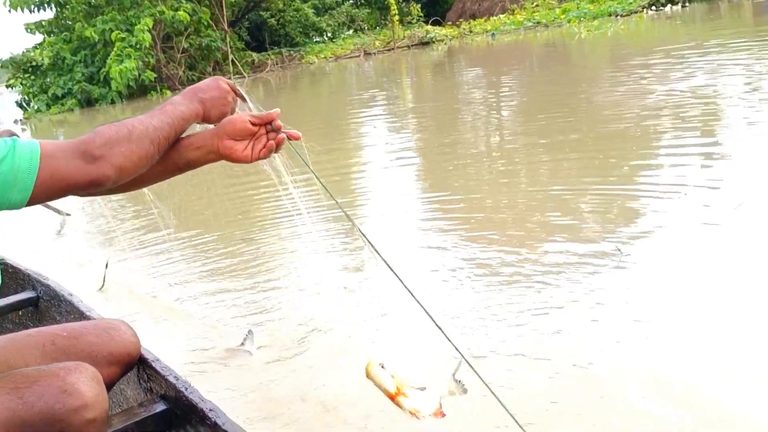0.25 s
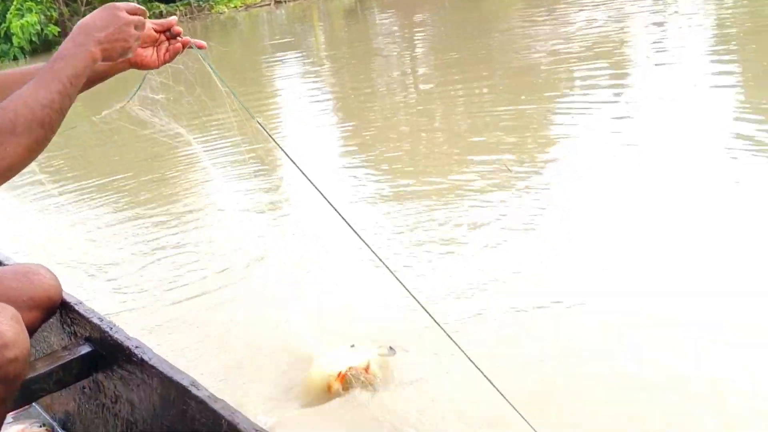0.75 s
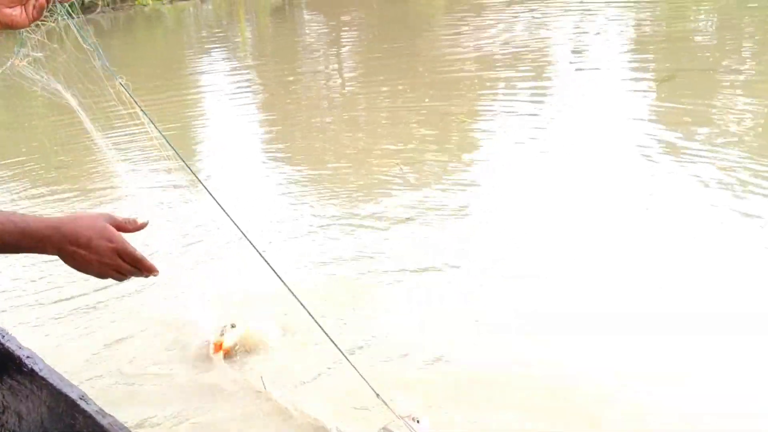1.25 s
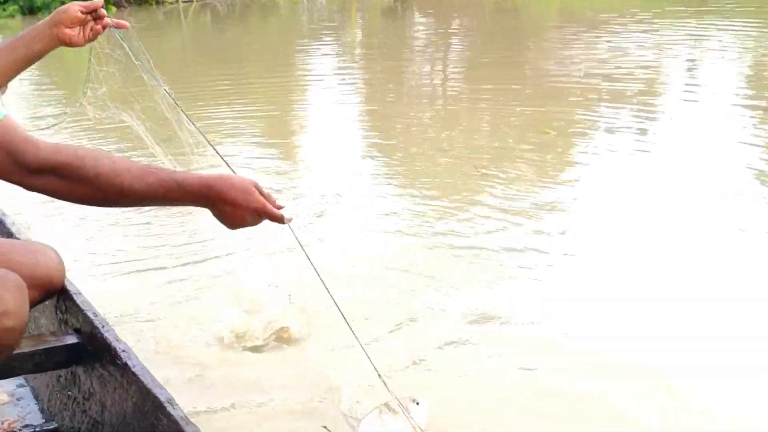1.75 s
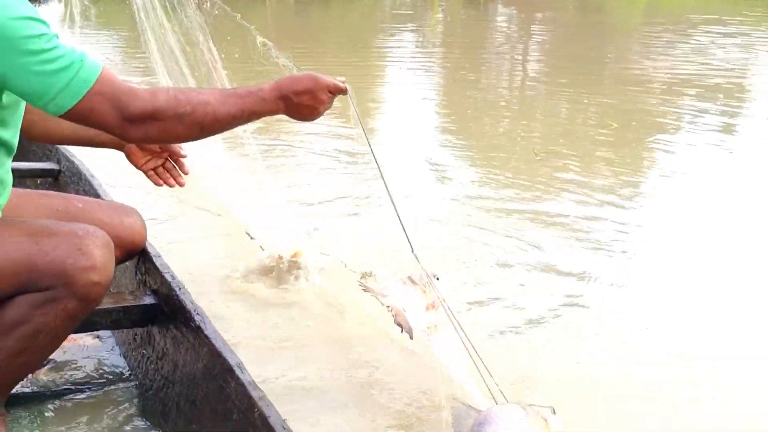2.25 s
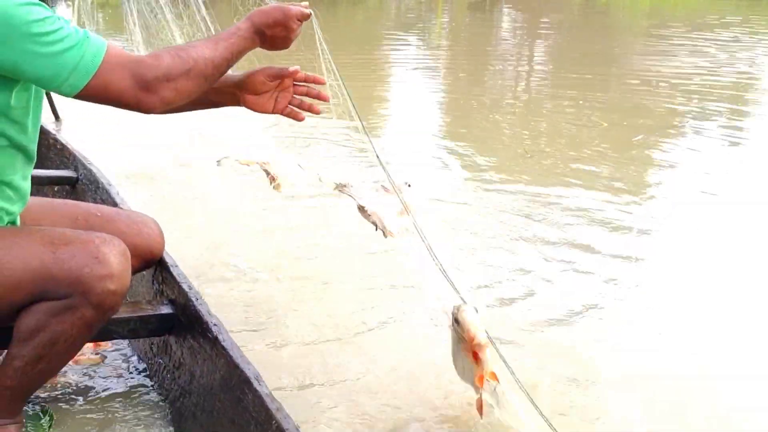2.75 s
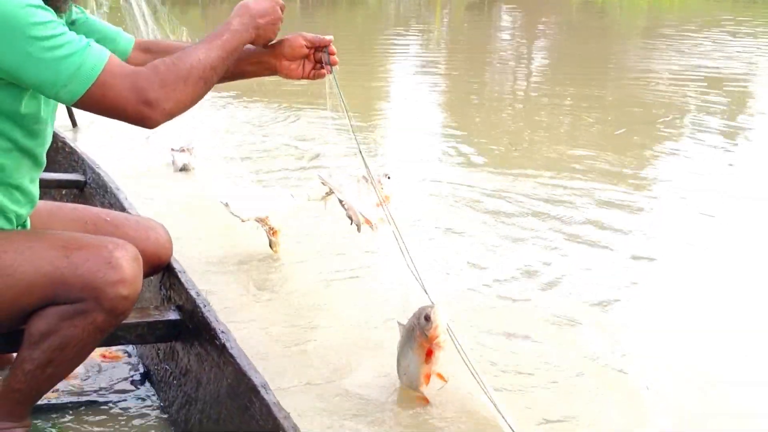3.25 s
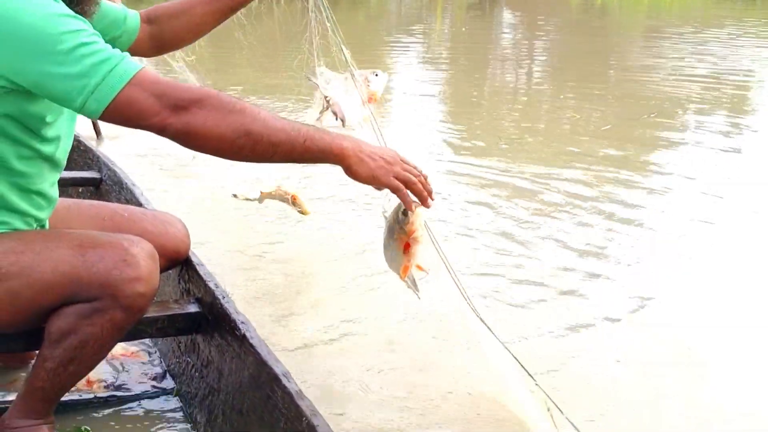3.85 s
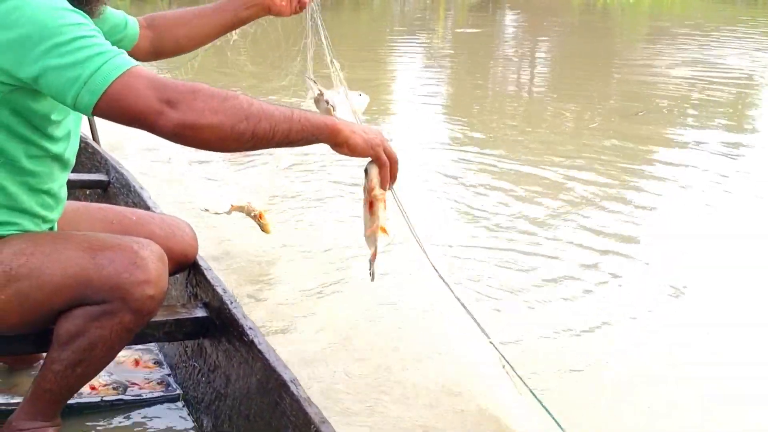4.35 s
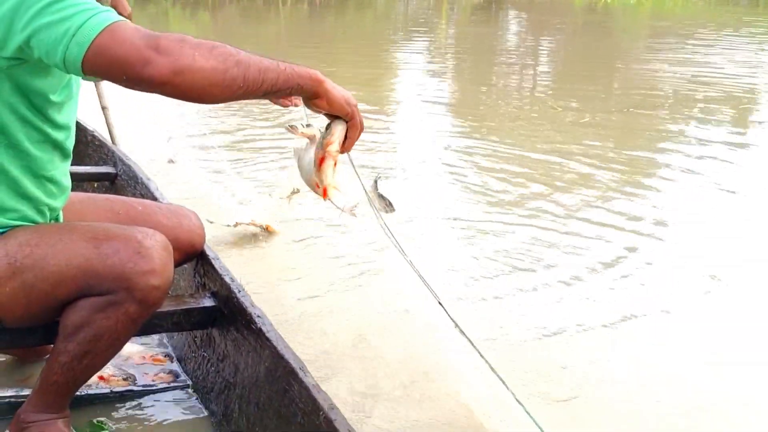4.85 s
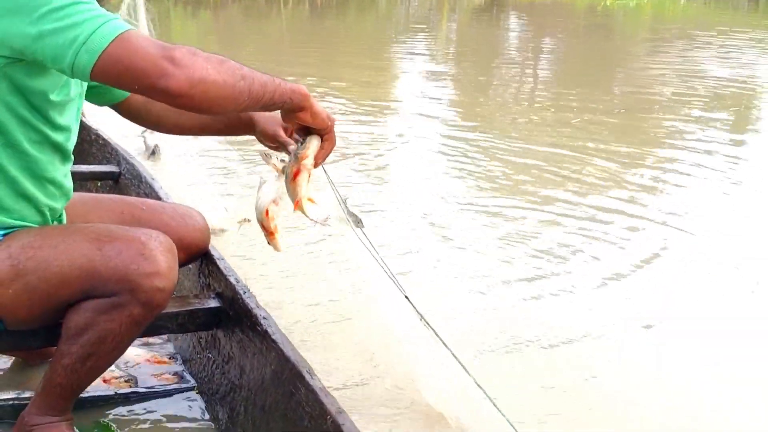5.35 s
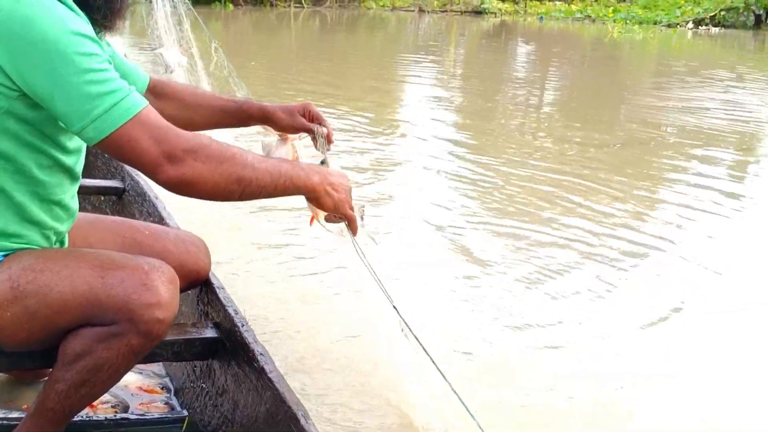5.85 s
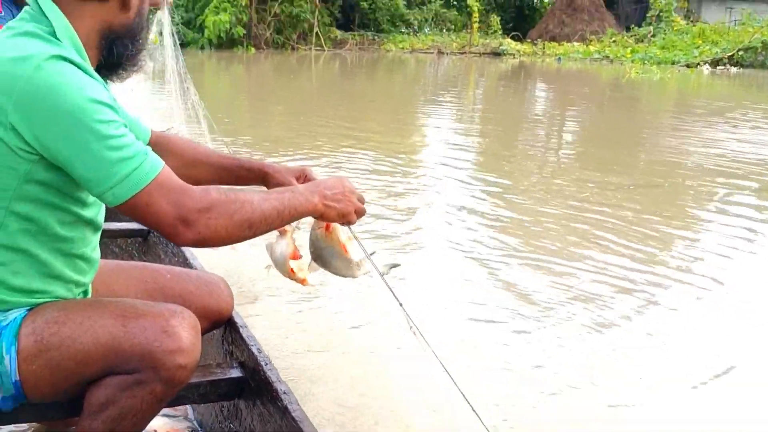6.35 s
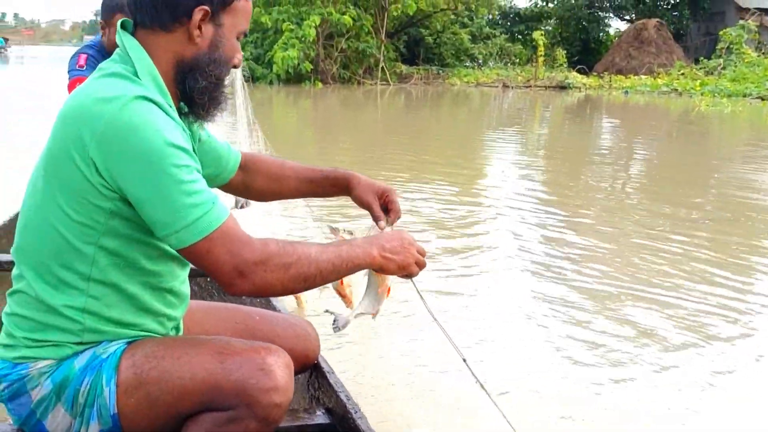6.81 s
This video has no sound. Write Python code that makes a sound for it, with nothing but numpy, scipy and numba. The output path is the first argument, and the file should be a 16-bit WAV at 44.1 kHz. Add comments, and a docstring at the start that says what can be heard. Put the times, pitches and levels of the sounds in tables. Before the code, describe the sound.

Fish thrash and water patters off a net beside a boat, with bubbly plops, tiny bright ticks and hollow low thuds on the planks. The biggest splash comes about a third of the way in, then the handling quietens. Birds to the right take over with short falling chirps, sliding whistles and a buzzy trill, broken by one loud knock and later a light rattle on the wood. Close outdoor stereo pickup, faint air behind.

```python
"""Net hauled over a boat's side

A fisherman hauls a net with small fish in it over the side of a wooden boat on a calm river.
Hull thumps and knocks are damped modes; splashes and drips are gliding bubble rings and puffs of noise.
The mesh ticks softly; birds on the bank to the right are swept tones and rough grains.
Behind it all lies a very quiet background, open air with a haze of distant birds: noise in wavering bands.
"""
import sys
import numpy as np
from scipy import signal
from scipy.io import wavfile
from scipy.ndimage import uniform_filter1d
from numba import njit

SR = 44100
rng = np.random.default_rng(int(sys.argv[2]) if len(sys.argv) > 2 else 0)


def log_audio(samples):
    """Write samples as a 16-bit WAV file to the path given in sys.argv[1]."""
    # one column per channel
    frames = np.atleast_2d(samples).T
    # limit to full scale, then quantise
    limited = np.clip(frames, -1, 1)
    pcm = np.round(limited * 32767).astype(np.int16)
    wavfile.write(sys.argv[1], SR, pcm)


N = 312228
TIME = np.arange(N) / SR


def undb(db):
    """Decibels to gain."""
    return 10 ** (np.asarray(db) / 20)


def unit(x):
    """Scale to rms 1."""
    return x / np.sqrt(np.mean(x ** 2) + 1e-30)


def curves(table):
    """Each column of a table interpolated over time."""
    s, *columns = np.transpose(table)
    return [np.interp(TIME, s, c) for c in columns]


def during(table):
    """Gate: 1 while a table lasts, with 10 ms edges."""
    inside = (TIME >= table[0][0]) & (TIME <= table[-1][0])
    return uniform_filter1d(1. * inside, 441)


def progress(length_s):
    """0 to 1 over a note."""
    return np.linspace(0, 1, max(int(length_s * SR), 99))


def add(out, s, x):
    """Mix a sound in at time s."""
    i = int(np.clip(s * SR, 0, N - 1))
    out[..., i:i + x.shape[-1]] += x[..., :N - i]


def band(x, hz, width_hz):
    """Steep band-pass around hz."""
    low = np.hypot(hz, width_hz / 2) - width_hz / 2
    high = min(low + width_hz, .48 * SR)
    return signal.sosfilt(signal.butter(3, [low, high], "bandpass", fs=SR, output="sos"), x)


def walk(rate_hz):
    """Random levels, held 1 / rate_hz and slewed twice; rms near 1."""
    k = max(int(SR / rate_hz), 2)
    steps = np.repeat(rng.standard_normal(N // k + 1), k)
    return unit(uniform_filter1d(uniform_filter1d(steps, k), k)[:N])


def swells(table, rise_db_per_s):
    """Summed gain of swells that each build up to a height and fade."""
    return sum(undb(db - np.maximum((s - TIME) * rise_db_per_s, (TIME - s) * fade_db_per_s))
               for s, db, fade_db_per_s in table)


def pan(x, pan_db):
    """Level of left over right in dB; the overall level dips somewhat as the pan widens."""
    gains = undb(np.array([[pan_db], [-pan_db]]) / 2)
    return x * gains / np.sqrt(np.cosh(pan_db * np.log(10) / 10))


def scatter(x, t60_s, wet_db):
    """Add a tail of scattered reflections, different at each ear."""
    t = np.arange(int(t60_s * SR)) / SR
    tail = rng.standard_normal((2, len(t))) * 1000 ** (-t / t60_s)
    tail /= np.sqrt(np.sum(tail ** 2, axis=1, keepdims=True))
    wet = signal.fftconvolve(np.broadcast_to(x, (2, N)), tail, axes=1)[:, :N]
    return (x + undb(wet_db) * wet) / np.sqrt(1 + undb(2 * wet_db))


@njit
def ring_grains(start, step, cycles, size, glide, n):
    """Damped sines that glide; cycles = turns at the start pitch until the ring has died."""
    out = np.zeros(n)
    for k in range(len(start)):
        length, phase = int(2 * np.pi * cycles[k] / step[k]) + 2, 0.
        for i in range(min(length, n - start[k])):
            u = i / length
            phase += step[k] * (1 + glide * u)
            out[start[k] + i] += size[k] * (np.exp(-6 * u) - np.exp(-40 * u)) * np.sin(phase)
    return out


def grains(rate_hz, low_hz, high_hz, cycles, spread_db, glide):
    """Steady shower of rings of random pitch, life and size, rms 1."""
    draws = np.random.default_rng(rng.integers(2 ** 31)).random((int(rate_hz * N / SR), 4))
    when, pitch, life, size = draws.T
    hz = low_hz * (high_hz / low_hz) ** pitch
    sizes = undb(spread_db * np.minimum(-np.log(1 - size), 4))
    starts = (when * N).astype(np.int64)
    return unit(ring_grains(starts, 2 * np.pi * hz / SR, cycles * (.5 + life), sizes, float(glide), N))


def burst(hz, width_hz, t60_s, grit_db):
    """Gritty puff of noise that swells quickly and dies away, peak 1."""
    t = np.arange(SR // 3) / SR
    noise, grit = rng.standard_normal((2, len(t)))
    shape = 1000 ** (-t / t60_s) * (1 - np.exp(-(25 * t / t60_s) ** 2))
    gritty = noise * undb(grit_db * unit(uniform_filter1d(grit, size=60)))
    x = band(gritty * shape, hz, width_hz)
    return x / np.abs(x).max()


BACKGROUND_DB = -76.5  # rms of all bands together
LURCH_RISE_DB_PER_S = 195.5
# spectrum of the quiet background, open air with a haze of distant birds near 4 kHz:
# (f/Hz, relative density/dB per Hz)
BACKGROUND_SPECTRUM = [(30, -19), (60, -5), (120, 2), (300, -9), (650, -11), (1000, -24.5), (2000, -16),
                       (3800, -16.5), (5200, -25.5), (8000, -31), (10500, -20), (15500, -34)]
# rocking of the boat: (t/s at the height, level/dB, fade/dB per s)
LURCHES = [(1.3, -61, 39.5), (2.2, -63, 21.5), (3.9, -64.5, 70), (4.66, -66, 68)]


def background():
    """Open air and a haze of distant birds as wavering noise bands; low rumble of the rocking boat."""
    out, (points_hz, points_db) = 0, np.transpose(BACKGROUND_SPECTRUM)
    for hz in 40 * 2 ** np.arange(0, 8.6, .5):
        mid, side = band(rng.standard_normal((2, N)), hz, hz / 3)
        db = np.interp(np.log(hz), np.log(points_hz), points_db) + 3.4 * walk(9.2)
        width = min(0.35 + hz / 1500, 1)
        out = out + undb(db) * (mid + width * side * np.array([[1], [-1]]))
    rumble = unit(band(rng.standard_normal(N), hz=86.3, width_hz=39))
    return unit(out) * undb(BACKGROUND_DB) + rumble * swells(LURCHES, LURCH_RISE_DB_PER_S)


# birds further off: (t/s, level/dB before the syllables)
CHATTER = [(0, -87), (.45, -68.5), (.9, -58.5), (1.9, -71), (2.85, -69), (2.97, -64), (3.65, -60.5),
           (3.8, -57), (4.4, -59), (5.1, -62.5), (5.35, -69.5), (5.55, -63), (7.08, -62)]


def chatter():
    """Distant birds: showers of falling rings in syllables; the stronger ones reach higher."""
    chirps = grains(rate_hz=190, low_hz=3333, high_hz=4586, cycles=150, spread_db=3, glide=-0.24)
    whistles = grains(rate_hz=60, low_hz=1750, high_hz=3164, cycles=160, spread_db=2.5, glide=-0.2)
    rasps = grains(rate_hz=250, low_hz=4300, high_hz=5460, cycles=50, spread_db=6, glide=-0.17)
    syllables = np.tanh(walk(18))
    calls = chirps * undb(6.5 * syllables) + rasps * undb(10 * syllables - 15.5)
    return calls * undb(curves(CHATTER)[0]) + whistles * undb(-76.5 + 3.4 * walk(9))


TRILL_SAG_HZ_PER_S, TRILL_SWELL = 350, 0.66  # pitch sag at the ends per s of length; level exponent
TRILL_CLEAR, TRILL_JITTER = 0.79, .008  # steady tone against flutter; rms pitch jitter as a share
# long buzzing trills: (t/s, length/s, top f/Hz at ratio 1, relative level/dB)
TRILLS = [(0.85, 0.66, 5994, -63), (5.49, 1.4, 6114, -59), (6.779, 0.47, 5990, -64)]
# bands of a trill: (pitch ratio, flutter f/Hz, relative level/dB)
TRILL_BANDS = [(.66, 1120, -0.5), (.775, 610, -1), (.9, 1030, -5.5), (1, 519, -0.5)]


def trills():
    """Buzzing note in several fluttering bands; pitch and level follow the effort."""
    out = np.zeros(N)
    for s, length_s, top_hz, db in TRILLS:
        effort = np.abs(np.sin(np.pi * progress(length_s) ** 0.76))
        n = len(effort)
        hz = top_hz - TRILL_SAG_HZ_PER_S * length_s * (1 - effort)
        carrier = 2 * np.pi * np.cumsum(hz * (1 + TRILL_JITTER * walk(200)[:n])) / SR
        buzz = np.zeros(n)
        for ratio, flutter_hz, band_db in TRILL_BANDS:
            flutter = TRILL_CLEAR + walk(flutter_hz)[:n]
            buzz += undb(band_db + 1.86 * walk(22.1)[:n]) * flutter * np.sin(ratio * carrier)
        add(out, s, buzz * undb(db + 1.29 * walk(150)[:n]) * effort ** TRILL_SWELL)
    return out


# faint high fizz above the long trill: (t/s, level/dB before flicker)
TRILL_FIZZ = [(5.5, -96), (5.75, -84), (7.08, -83)]


def trill_fizz():
    """Thin high overtones fizz above the trill: a flickering shower of short rings."""
    fizz = grains(rate_hz=590, low_hz=6400, high_hz=8900, cycles=46, spread_db=2, glide=0)
    fizz *= undb(curves(TRILL_FIZZ)[0] + 2 * walk(20)) * during(TRILL_FIZZ)
    return scatter(fizz, t60_s=0.11, wet_db=3.0)


WHISTLE_EASE = 1.4  # above 1, a slide slows towards its end
CHIRP_S, CHIRP_FALL = 0.055, 0.16  # length; share by which the pitch falls
CHIRP_ROUGH, CHIRP_ROUGH_HZ = 0.0443, 904.5  # rms pitch roughness as a share; its rate
RASP_LEAD_S, RASP_RATIO, RASP_DB = 0.013, 1.162, -5  # relative to the chirp
ECHO_S, ECHO_DB = 0.03, -16  # the bank throws each note back once
# whistles that slide, mostly upwards: (t/s, length/s, start f/Hz, end f/Hz, level/dB)
WHISTLES = [(0, .07, 1530, 1607, -65.5), (0.045, 0.28, 2282, 2000, -70), (0.07, 0.082, 4020, 4190, -65),
            (0.155, 0.15, 4250, 5100, -65.5), (0.391, 0.078, 3760, 3837, -60),
            (1.882, 0.086, 2510, 2394, -62.5), (3.495, 0.15, 1960, 2754, -69),
            (3.612, 0.06, 4080, 4165, -48.5), (3.841, 0.043, 3160, 3370, -55.5),
            (3.952, 0.1, 3964, 4148, -47.5), (4.029, 0.11, 4230, 4620, -52.5),
            (4.428, 0.064, 3536, 3750, -51.5), (4.478, 0.15, 3820, 4210, -56.5),
            (4.626, 0.097, 4534, 4290, -52.5), (4.677, 0.1, 1565, 1640, -69),
            (4.74, .16, 4150, 2550, -66.5), (4.871, 0.091, 3270, 3580, -54.5),
            (4.997, 0.094, 4085, 3824, -52.5), (5.087, 0.23, 3710, 4363, -56),
            (5.296, 0.056, 4280, 4016, -51), (5.334, 0.088, 4016, 4220, -48),
            (5.632, 0.23, 3145, 3910, -58.5), (5.897, 0.16, 4096, 3946, -56),
            (6.203, 0.11, 3694, 3994, -51), (6.306, 0.071, 4103, 4330, -47),
            (6.356, 0.034, 4250, 4373, -44), (6.47, 0.11, 2010, 2840, -60), (6.596, 0.19, 3460, 4220, -53),
            (6.788, 0.21, 3276, 4030, -52.5), (6.998, 0.14, 4584, 4540, -48)]
# short falling chirps: (t/s, start f/Hz, level/dB)
CHIRPS = [(1.01, 4150, -58.5), (1.206, 3980, -56), (1.465, 3980, -61.5), (2.94, 4160, -53.5),
          (3.0, 3880, -59.5), (3.085, 3990, -56.5), (3.21, 3905, -60), (3.339, 4000, -56.5),
          (3.492, 3740, -54), (3.734, 4380, -54.5), (3.89, 4120, -58.5), (4.03, 3850, -59),
          (4.2, 3900, -60), (4.29, 3950, -60), (4.345, 3820, -53.5), (5.025, 3944, -53.5),
          (5.485, 4020, -53.5), (6.013, 3945, -54.5), (6.12, 3200, -67), (6.335, 3090, -62.5),
          (6.48, 3690, -54)]
# thin calls that arch over or dip: (t/s, length/s, middle f/Hz, share by which the ends lie lower, level/dB)
ARCHES = [(0.022, 0.025, 5750, 0.14, -66.5), (0.109, 0.038, 5580, 0.19, -66),
          (0.229, 0.097, 5824, 0.12, -63), (0.874, 0.08, 4900, 0.13, -62), (0.976, 0.17, 2535, -0.22, -63)]


def songs(waver=0.0046):
    """Nearer birds: whistles and arches are wavering tones; chirps are hoarse, each led by a higher rasp."""
    out = np.zeros(N)
    wobble = 1 + waver * walk(170)
    hoarse = 1 + CHIRP_ROUGH * walk(CHIRP_ROUGH_HZ)
    notes = []
    for s, length_s, start_hz, end_hz, db in WHISTLES:
        slide = (1 - progress(length_s)) ** WHISTLE_EASE
        notes.append((s, db, end_hz + (start_hz - end_hz) * slide, wobble))
    for s, hz, db in CHIRPS:
        fall = 1 - (1 - progress(CHIRP_S)) ** 1.486
        notes.append((s, db, hz * (1 - CHIRP_FALL * fall), hoarse))
    for s, length_s, hz, depth, db in ARCHES:
        arch = (2 * progress(length_s) - 1) ** 2
        notes.append((s, db, hz * (1 - depth * arch), wobble))
    for s, db, hz, unsteady in notes:
        phase = 2 * np.pi * np.cumsum(hz * np.roll(unsteady, -int(s * SR))[:len(hz)]) / SR
        envelope = np.abs(np.sin(np.linspace(0, np.pi, len(hz)))) ** 0.5
        add(out, s, undb(db) * unit(np.sin(phase) * envelope))
    for s, hz, db in CHIRPS:
        swell = np.sin(np.pi * progress(CHIRP_S)) ** 2
        rasp = unit(band(rng.standard_normal(len(swell)), hz * RASP_RATIO, width_hz=830))
        add(out, s - RASP_LEAD_S, undb(db + RASP_DB) * swell * rasp)
    add(out, ECHO_S, undb(ECHO_DB) * out)
    return out


BANK_LAG_S = .00033  # the left ear is further from the bank


def birds():
    """Songs, chatter and trills from the right, blurred by the trees on the bank."""
    bank = pan(songs() * undb(2.7 * walk(70)) + chatter() + trills(), -6.0)
    bank[0] = np.roll(bank[0], int(BANK_LAG_S * SR))
    return scatter(bank, t60_s=0.24, wet_db=-2.5)


def trickle():
    """Water trickles faintly along the hull: a steady shower of rising bubble rings."""
    bubbles = grains(rate_hz=300, low_hz=737.0, high_hz=2890, cycles=35, spread_db=4.0, glide=0.18)
    return scatter(bubbles * undb(-87.5), t60_s=0.24, wet_db=4.0)


SPLASH_RISE_DB_PER_S, SPLASH_FIZZ_DB = 250, -21  # fizz relative to the gurgle
SPRAY_DB, FIZZ_DB, PLINK_DB, POUR_DB = -60, -50, -61, -54  # at 0 dB flow
FIZZ_GROWTH = 2.93  # dB of bubbling per dB of flow
GULP_GROWTH = 0.74  # dB of gulp per dB of splash: gentle stirring mostly gulps
# fish thrashing at the surface: (t/s at the height, gurgle level/dB, fade/dB per s)
SPLASHES = [(.675, -52, 196), (.875, -58, 123), (1.68, -53.5, 191.5), (2.19, -57.5, 152), (2.3, -38, 75.5)]
# water running off the lifted net: (t/s, flow level/dB)
RUNOFF = [(.45, -18.5), (.6, -10.5), (.7, -2), (.8, -13), (1.2, -22), (1.5, -15), (1.75, -4.5),
          (1.92, -8.5), (2.1, -4), (2.22, -2), (2.76, -2.5), (2.87, -10.5), (3.1, -20), (3.22, -17)]


def churn():
    """Fish and mesh stir the water: big bubbles gurgle, small ones fizz, spray patters down."""
    splash = swells(SPLASHES, SPLASH_RISE_DB_PER_S)
    flow_db, flowing = curves(RUNOFF)[0], during(RUNOFF)
    bubbling = undb(FIZZ_GROWTH * flow_db) * flowing
    fizzing = np.hypot(undb(FIZZ_DB) * bubbling, undb(SPLASH_FIZZ_DB) * splash)
    gurgle = grains(rate_hz=750, low_hz=599, high_hz=1795, cycles=37, spread_db=2, glide=0.18) * splash
    fizz = grains(rate_hz=380, low_hz=1205, high_hz=4030, cycles=42, spread_db=3.5, glide=0.26) * fizzing
    # larger trapped air pockets
    gulp = grains(rate_hz=220, low_hz=330, high_hz=713, cycles=32, spread_db=2.5, glide=0.18)
    gulp *= splash ** GULP_GROWTH * undb(-21)
    # dense, uneven wash off the net
    pour = grains(rate_hz=1100, low_hz=1220, high_hz=3600, cycles=27, spread_db=3, glide=.2)
    pour *= undb(POUR_DB + flow_db + 2.5 * walk(70)) * flowing
    # sparse bigger drops from the mesh
    plinks = grains(rate_hz=37, low_hz=711, high_hz=2680, cycles=39.0, spread_db=1.0, glide=0.54)
    plinks *= bubbling * undb(PLINK_DB)
    # fine spray all around: each ear has its own drops
    froth = np.array([grains(rate_hz=600, low_hz=1620, high_hz=4300, cycles=11, spread_db=3, glide=.1)
                      for _ in range(2)])
    spray = np.array([grains(rate_hz=1600, low_hz=3505, high_hz=15200, cycles=6.4, spread_db=2, glide=0)
                      for _ in range(2)])
    mist = froth * fizzing * undb(-1.5)
    mist += pan(spray, 1.7) * undb(SPRAY_DB + flow_db + 4.2 * walk(65)) * flowing
    return scatter(pan(gurgle + gulp + pour + fizz + plinks, -0.72), t60_s=.04, wet_db=-1.0) + mist


DROP_CYCLES = 18.3  # ring length in turns, so big bubbles last longer
# single drops and air pockets: (t/s, peak level/dB, start f/Hz, pitch ratio at the end)
DROPS = [(.485, -42, 2610, 0.78), (.563, -40.5, 2560, 0.94), (.567, -51.5, 459, 1.45),
         (.579, -46, 2470, 0.81), (.63, -50, 1810, 1.2), (.657, -45, 608, 0.71), (.865, -54.5, 549, 1.07),
         (1.283, -39, 1540, 1.9), (1.346, -38.5, 1563, 1.5), (1.66, -49.5, 540, 1.24),
         (1.683, -47.5, 596, 0.92), (2.028, -51.5, 1116, 1.18), (2.035, -44.5, 2790, 1.2),
         (2.05, -41.5, 3040, 0.76), (2.078, -41, 1345, 1.6), (2.147, -41, 1600, 0.97),
         (2.16, -43.5, 3150, 1.1), (2.212, -42, 1206, 1.2), (2.252, -40.5, 505, .92),
         (2.267, -33.5, 2060, 1.03), (2.28, -41, 241, 1.5), (2.332, -38, 1130, 1.1),
         (2.468, -41, 1700, 1.17), (2.497, -44, 708, 1.05), (2.574, -37.5, 1165, 1.52),
         (2.677, -39, 2100, 1.6), (2.731, -46.5, 686, 1.35), (2.735, -44, 1900, 1.05),
         (2.8, -44.5, 1500, 0.87), (4.926, -53.5, 1096, 1.26), (4.927, -55.5, 670, 0.95),
         (4.966, -44, 2330, 1.02), (5.217, -45, 2750, 1.02), (5.457, -39.5, 2600, 0.76)]


def drops():
    """A trapped bubble swells, rings and slides in pitch as it nears the surface."""
    out = np.zeros(N)
    for s, db, hz, ratio in DROPS:
        length_s = DROP_CYCLES / hz
        u = np.arange(int(2 * length_s * SR)) / (length_s * SR)
        phase = 2 * np.pi * np.cumsum(hz * ratio ** np.minimum(u, 1.2)) / SR
        envelope = (1 - np.exp(-14 * u)) * np.exp(-2.5 * u ** 3)
        add(out, s, undb(db) * np.sin(phase) * envelope)
    return scatter(pan(out, 0.73), t60_s=0.078, wet_db=-1)


SLAP_WIDTH, SLAP_WIDENING_DB = 0.72, 25  # bandwidth over centre at -35 dB; dB harder that doubles it
# slaps of fish, water and wet mesh, plus the sharp contact that leads the hull knock at 5.34 s: (t/s, peak
# level/dB, centre f/Hz, t60/s)
SLAPS = [(0.56, -53, 2400, 0.077), (0.7, -47, 1930, 0.045), (0.852, -24, 2430, 0.0088),
         (1.327, -42.5, 1980, 0.11), (1.391, -40.5, 1690, 0.012), (1.642, -35, 3030, 0.021),
         (1.727, -39, 3170, 0.059), (1.793, -41, 2430, 0.059), (1.869, -44.5, 2750, 0.048),
         (1.979, -40, 2650, 0.0096), (2.093, -34.5, 3100, 0.037), (2.176, -22, 2150, 0.039),
         (2.2446, -20.5, 2880, 0.017), (2.249, -34.5, 1310, 0.32), (4.963, -44.5, 2260, 0.1),
         (5.3419, -30, 1960, 0.013), (5.451, -43, 2200, 0.2), (6.263, -50.5, 2019, 0.11)]
# clearest ticks of droplets and taut mesh: (t/s, level/dB, played 5.5 dB higher)
TICKS = [(0.493, -59), (0.61, -53.5), (0.705, -48.5), (0.85, -37), (.925, -51), (1.31, -48.5), (1.641, -43),
         (1.719, -49.5), (1.866, -46), (1.935, -51), (2.09, -40.5), (2.17, -30.5), (2.245, -41),
         (2.578, -43), (2.6918, -55), (2.7587, -51), (2.9556, -46.5), (3.13, -44.5), (3.243, -64),
         (4.2, -60), (4.58, -59.5), (5.22, -62)]


def slaps():
    """Broad wet slaps and tiny bright ticks as puffs of noise, mirrored by water and planks."""
    wet, ticks = np.zeros(N), np.zeros(N)
    for s, db, hz, t60_s in SLAPS:
        width_hz = hz * SLAP_WIDTH * 2 ** ((db + 35) / SLAP_WIDENING_DB)
        add(wet, s, undb(db) * burst(hz, width_hz, t60_s, grit_db=3))
    for s, db in TICKS:
        add(ticks, s, undb(db + 5.5) * burst(hz=6450, width_hz=7500, t60_s=0.0227, grit_db=14.5))
    return (scatter(pan(wet, -1.1), t60_s=0.1, wet_db=1.5)
            + scatter(pan(ticks, 4.3), t60_s=0.019, wet_db=23.0))


SHIFT_S, SHIFT_GAP_S, SHIFT_DB, SHIFT_PUSH_HZ, SHIFT_RATIO = 6.895, 0.018, -48, 198, 1.9  # means


def shifting(count=7):
    """Something shifted along the planks: a quick, uneven run of light taps, as rows of BLOWS."""
    taps = []
    for k, (late, hard, spot) in enumerate(rng.standard_normal((count, 3))):
        s = SHIFT_S + SHIFT_GAP_S * k * (1 + .08 * late)
        taps.append((s, SHIFT_DB + 3.6 * hard, SHIFT_PUSH_HZ, SHIFT_RATIO * (1 + 0.138 * spot)))
    return taps


# blows on the hull: (t/s, peak level/dB, centre f/Hz of the push (high = hard), pitch ratio of the spot struck)
BLOWS = [(1.2665, -25, 280, 1.03), (1.277, -27, 256, 1.03), (1.326, -29.5, 412, 0.95),
         (1.334, -34, 420, 1.08), (1.772, -27, 320, 1.04), (1.803, -24, 215, 1.024),
         (1.8374, -23.5, 220, 1.03), (1.953, -39, 150, 0.81), (1.998, -32.5, 127, 1.02),
         (2.025, -35.5, 146, 1), (2.081, -38, 108, 1.02), (2.148, -26.5, 260, 0.96),
         (2.409, -26.5, 248, 1.04), (2.602, -27, 232, 1.04), (2.664, -42, 160, 1.48),
         (2.906, -33.5, 228, 1.1), (2.924, -29, 155, 1.044), (2.946, -37, 142, 0.97), (3.97, -52, 600, 1.3),
         (5.3455, -17, 800, 1), (5.3515, -21.5, 520, 1), (5.8, -44, 400, 1.25), (6.561, -41, 98, 0.86),
         (6.6045, -27.5, 564, 0.95), (7.028, -41, 146, 0.98)]
# hull modes: (f/Hz at ratio 1, relative level/dB before the push, t60/s before water drag)
HULL_MODES = [(170, 0, 0.22), (203, 6, 0.13), (264, -1, 0.14), (322, -5, 0.12), (399, -5, 0.13),
              (492, -6, 0.12), (564, 0, 0.1), (708, 3, 0.09), (840, -1, 0.09), (924, -1.5, 0.09),
              (1136, -6.5, 0.11), (1254, -12, 0.1), (1364, -3.5, 0.12), (1700, -8, 0.07),
              (2150, -22.5, .04)]


def hull(steep=1.3, rise=1.5, port_spread=1.0, hold_s=0.025, free=0.83, thud=0.32, clack=0.097,
         drag_per_s=24, reach=2.43):
    """Each blow rings the planks; a soft contact reaches only the low modes."""
    out, t = np.zeros((2, N)), np.arange(SR // 3) / SR
    mode_hz, mode_db, t60_s = np.transpose(HULL_MODES)[:, :, None]
    highpass = signal.butter(2, 115, "highpass", fs=SR, output="sos")
    for s, peak_db, push_hz, ratio in list(BLOWS) + shifting():
        f = mode_hz * ratio * (1 + 0.0038 * rng.standard_normal(mode_hz.shape))
        rel = f / push_hz
        weight = undb(mode_db) * (rel / (1 + rel ** 2)) ** steep / (1 + (rel / reach) ** 4)
        # short waves reach the two ears out of step
        phase = rng.uniform(0, 2 * np.pi, f.shape) * np.minimum(f / 700, 1)
        phase = phase + port_spread * f / 1000 * rng.standard_normal((2, len(f), 1))
        # water drags most on the high modes
        decay_per_s = np.log(1000) / t60_s + drag_per_s * (f / 1000) ** 2
        x = np.sum(weight * np.exp(-decay_per_s * t) * np.sin(2 * np.pi * f * t + phase), axis=1)
        # hard contact: crowd of unresolved plank modes, then the clack of the contact itself
        hardness = (push_hz / 800) ** 3
        x += thud * np.abs(x).max() * hardness * burst(hz=900, width_hz=1040, t60_s=0.083, grit_db=4.0)
        x += clack * np.abs(x).max() * hardness * burst(hz=1990, width_hz=720, t60_s=0.037, grit_db=3.0)
        # water against the hull soon soaks up the first wide swings
        x *= free + (1 - free) * np.exp(-(t / hold_s) ** 4)
        # harder contact rises faster; planks radiate almost no deep bass
        x = signal.sosfilt(highpass, x * (1 - np.exp(-(rise * push_hz * t) ** 2)))
        add(out, s, x * undb(peak_db) / np.abs(x).max())
    return scatter(pan(out, -1.1), t60_s=0.075, wet_db=-15)


def scene():
    """River bank, net, water and boat together."""
    distant = background() + birds() + trill_fizz()
    return distant + trickle() + churn() + drops() + slaps() + hull()


TOP_HZ = 15800


def record(dry):
    """The recorder cuts the top: steep low-pass."""
    return signal.sosfilt(signal.ellip(10, .2, 70, TOP_HZ, fs=SR, output="sos"), dry)


dry = scene()
out = record(dry)
log_audio(out)
```